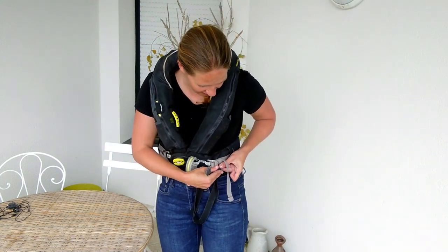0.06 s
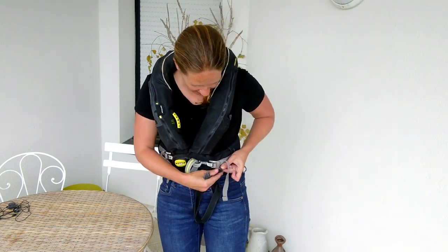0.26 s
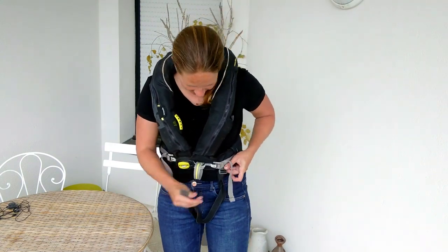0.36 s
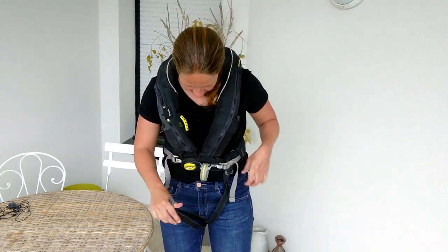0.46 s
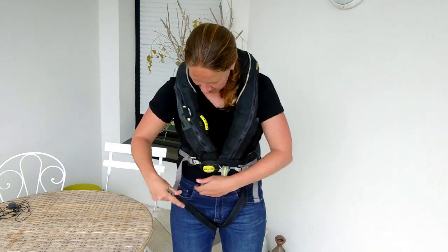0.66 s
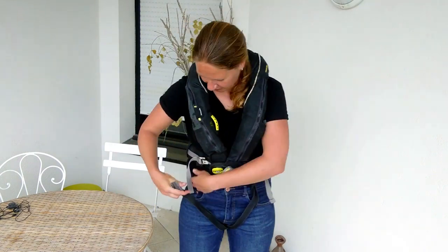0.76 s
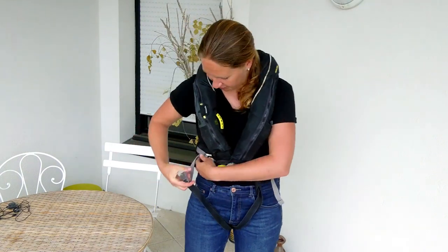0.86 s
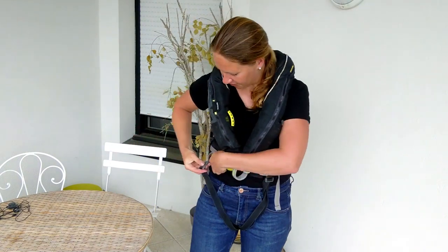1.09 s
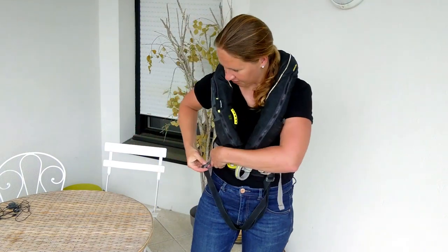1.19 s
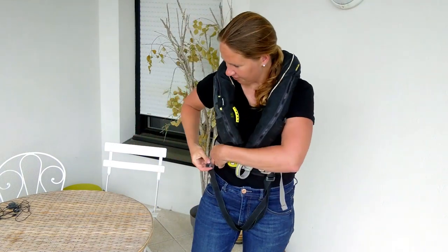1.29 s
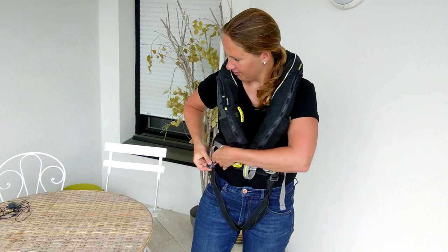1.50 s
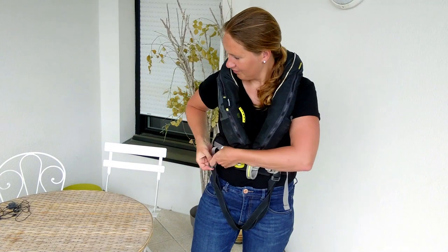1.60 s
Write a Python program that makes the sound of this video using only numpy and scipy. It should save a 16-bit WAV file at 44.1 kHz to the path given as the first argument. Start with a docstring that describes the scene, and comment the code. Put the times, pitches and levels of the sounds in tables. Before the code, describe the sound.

One sharp plastic buckle click, followed by faint strap handling over a low room hum.

```python
"""A low hum fills a bare, hard-walled room. After a faint rustle and a small knock, the plastic buckle
of a life jacket snaps shut: its latch cracks, the plastic rings and the walls echo.
Hands then work the webbing strap, which rustles as it rubs and ticks against the fittings.
The microphone hears little above 5 kHz."""
import sys
import numpy as np
from scipy import signal
from scipy.fft import rfft, irfft
from scipy.io import wavfile

SR = 44100
rng = np.random.default_rng(int(sys.argv[2]) if len(sys.argv) > 2 else 0)


def wav_out(sig):
    """Save sig, one row per channel (or a flat mono array), as 16-bit PCM at SR to the path in sys.argv[1]."""
    wavfile.write(sys.argv[1], SR, np.round(np.clip(np.atleast_2d(sig).T, -1, 1) * 32767).astype(np.int16))


N = 72765


def amp(db):
    """Turn decibels into a factor to multiply by."""
    return 10 ** (np.asarray(db) / 20)


def rms_one(x):
    """Scale a sound to an average (rms) strength of 1."""
    return x / np.sqrt(np.mean(x ** 2) + 1e-20)


def at_hz(table, hz, column=1):
    """Read between the rows of a table, on a log-frequency scale."""
    rows = np.array(table)
    return np.interp(np.log(hz), np.log(rows[:, 0]), rows[:, column])


def pair(mid, side, alike):
    """Mix two noises into left and right: likeness 0 or less is unrelated, 1 is the same."""
    alike = np.clip(alike, 0, 1)
    return np.sqrt(1 + alike) * mid + np.sqrt(1 - alike) * side * [[1], [-1]]


def coloured(noise, spectrum):
    """Shape two noises into a stereo sound with the given spectrum and a strength of 1."""
    # how alike the two ears' noise is: f/Hz, likeness
    likeness = [(60, 0.81), (180, 1), (550, 0.42), (1650, 0.062), (4970, -0.38), (15000, -1.16)]
    hz = np.maximum(np.fft.rfftfreq(N, 1 / SR), 1)
    mid, side = rfft(noise) * amp(at_hz(spectrum, hz))
    return rms_one(irfft(pair(mid, side, at_hz(likeness, hz)), N))


def band(x, low_hz, high_hz):
    """Gently turn down everything outside a range of frequencies."""
    edges = [low_hz, min(high_hz, .45 * SR)]
    return signal.sosfilt(signal.butter(2, edges, "band", fs=SR, output="sos"), x)


def room_hum(level_db=-47):
    """The room hums: steady noise, strongest in the bass."""
    # colour of the hum: f/Hz, relative level/dB
    spectrum = [(12, -12.5), (20, -7), (113, -1.5), (136, -5.5), (188, 1), (221, -6), (343, -5),
                (367, -12.5), (422, -6), (544, -15), (583, -12.5), (1060, -20.5), (1340, -26), (1770, -25),
                (5000, -40.5), (6500, -91), (11000, -120)]
    return amp(level_db) * coloured(rng.standard_normal((2, N)), spectrum)


def strap_rustle(grains_per_s=3000, spread_db=0.5):
    """Rubbed webbing gives off tiny uneven clicks (grains), louder when the hands are busier."""
    # how busy the hands are: t/s, relative level/dB
    effort = [(0.0, -62), (0.206, -61), (0.362, -56), (0.408, -51), (0.596, -61.5), (0.854, -56.5),
              (1.102, -56.5), (1.36, -55), (1.65, -55)]
    # colour of the rubbed fabric: f/Hz, relative level/dB
    cloth = [(300, -21), (700, 10), (1500, 4), (2500, 0.5), (4500, -2.5), (7000, -6), (9000, -43.5),
             (15000, -5.5)]
    grains = amp(spread_db * np.minimum(rng.exponential(1, (2, N)), 5))
    grains *= rng.choice([-1, 1], (2, N))
    grains *= rng.random((2, N)) < grains_per_s / SR  # keep only a random few
    times, db = np.transpose(effort)
    loudness = amp(np.interp(np.arange(N) / SR, times, db) + 0.5)
    return loudness * coloured(grains, cloth)


def strap_ticks(gain_db=-4, rise_share=.025):
    """Strap and fittings knock and scuff: each touch is a burst of noise that dies fast."""
    # touches: t/s, relative level/dB, centre f/Hz, width/octaves, time to fade by 60 dB/s
    touches = [(.144, -39.5, 880, 1.4, 0.036), (0.412, -49, 2550, 2.2, 0.062),
               (0.496, -49.5, 4180, 1.16, 0.27), (0.521, -45.5, 1870, 0.4, 0.097),
               (.535, -37.5, 1680, 0.67, 0.056), (.538, -50, 3370, 0.44, 0.12),
               (0.549, -38, 1100, 1.5, 0.062), (.653, -47.5, 1690, 0.61, 0.038),
               (0.754, -55, 6900, .2, 0.057), (.807, -54, 3000, 1.3, 0.075), (.89, -48, 3880, 1.24, 0.077),
               (.893, -55.5, 6800, 0.11, 0.23), (0.911, -48, 2480, 1, 0.18), (.914, -44, 700, 0.68, 0.16),
               (0.949, -48, 3200, 1.3, 0.15), (.955, -51, 6500, .2, 0.098), (0.99, -40, 1760, 1.97, 0.047),
               (1.025, -42, 1800, 1.8, 0.044), (1.034, -53, 6750, 0.11, 0.066),
               (1.052, -41, 920, 0.6, 0.047), (1.102, -56, 6850, 0.14, 0.073),
               (1.155, -58, 3940, 0.2, 0.13), (1.183, -38, 1110, 1.43, 0.1),
               (1.184, -49.5, 4200, .4, 0.058), (1.195, -47.5, 1620, 0.7, 0.18),
               (1.28, -37, 1110, 1.15, .06), (1.3, -39.5, 940, 0.8, 0.047),
               (1.427, -51.5, 2740, 0.52, 0.023), (1.463, -43, 1700, 1.26, .05),
               (1.483, -44, 1800, 1.2, 0.083), (1.553, -42.5, 2600, 0.57, 0.039),
               (1.56, -38, 706, 0.42, 0.064), (1.63, -48, 2260, 0.84, 0.061)]
    out, t = np.zeros(N + SR), np.arange(SR // 4) / SR
    for start, db, hz, octaves, fade_s in touches:
        edge_ratio = 2 ** (np.clip(octaves, .1, 4) / 2)
        noise = rms_one(band(rng.standard_normal(len(t)), hz / edge_ratio, hz * edge_ratio))
        rise = 1 - np.exp(-t / (rise_share * fade_s))
        fade = amp(db + gain_db - 60 * t / fade_s)
        out[int(start * SR):][:len(t)] += noise * rise * fade
    return out[:N]


def buckle_snap(crack_db=-22, ring_db=-5, bass_cut_hz=432):
    """The latch cracks and the plastic rings; quick echoes repeat both in a slightly changed colour."""
    # the latch's first touch and snap, then its first quick echoes from nearby surfaces:
    # t/s, relative level/dB, brightness/(dB per octave)
    clicks = [(.2060, -28, 0), (.2068, -12, 3), (.2074, -10, -3), (.2096, -17, 1), (.2110, -16, 0),
              (.2139, -20, 1), (.2174, -23, 0)]
    # the buckle's own tones: f/Hz, relative level/dB, time to fade by 60 dB/s
    tones = [(287, -8.5, 0.011), (581, -27, 0.16), (667, -7.5, 0.043), (980, 1.5, 0.0059),
             (1207, -12.5, 0.036), (1526, -26.5, 0.17), (1592, -18.5, 0.12), (2054, -14, 0.051),
             (2150, -4, 0.01), (2620, -1, 0.01), (3390, -3, 0.0075), (4020, 1.5, 0.012),
             (4670, 2.5, 0.0036), (6100, -31, 0.0028), (14900, -23, .001)]
    times, click_db, tilt_db = np.transpose(clicks)
    at, out = (times * SR).astype(int), np.zeros(N)
    out[at] = amp(click_db + tilt_db + crack_db)  # each crack is one sample long
    for hz, tone_db, fade_s in tones:
        pulse_db = click_db + tone_db + ring_db + tilt_db * np.log2(hz / 2000)
        pulses = np.full(N, 1e-18)
        pulses[at] = amp(pulse_db + rng.normal(0, 1.5, len(at)))
        # this filter turns each pulse into a fading sine wave
        decay, angle = amp(-60 / (fade_s * SR)), 2 * np.pi * hz / SR
        out += signal.lfilter([0, np.sin(angle)], [1, -2 * decay * np.cos(angle), decay ** 2], pulses)
    return signal.sosfilt(signal.butter(3, bass_cut_hz, "high", fs=SR, output="sos"), out)


def room_echo(x, gain_db=-28, build_s=.008):
    """Reflections from the hard walls build up quickly, then each frequency band fades at its own pace."""
    # the walls' echo: f/Hz, time to fade by 60 dB/s, relative level/dB, left-right likeness
    walls = [(255, 0.89, -9.5, 0.34), (420, .3, -11.5, 0.83), (570, 0.31, -3, 0.79), (860, 0.32, -3, 0.71),
             (1210, 0.25, -2.5, 0.15), (1930, 0.4, 5, 0.13), (2430, .33, -7, 0.072), (3500, 0.3, -5, 0.089),
             (4750, 0.29, -12, 0.1), (6830, 0.41, -2, .1), (10250, 0.45, -8.5, 0.047),
             (13900, 0.18, 20.5, .1)]
    t, echo = np.arange(SR) / SR, np.zeros((2, SR))
    edges_hz = 120 * 2 ** np.arange(0, 7.6, .5)  # half an octave apart
    noise = rng.standard_normal((2, 2, SR))
    for k, (low, high) in enumerate(zip(edges_hz, edges_hz[1:])):
        fade_s, db, alike = (at_hz(walls, np.sqrt(low * high), column) for column in (1, 2, 3))
        mid, side = band(noise[k % 2], low, high)
        echo += pair(mid, side, alike) * amp(db - 60 * t / fade_s)
    echo *= amp(gain_db) * (1 - np.exp(-(t / build_s) ** 2))
    return signal.fftconvolve(echo, x[None], axes=1)[:, :N]


def scene(tick_echo_db=-7, left_louder_db=3):
    """The hum, the jacket's sounds and their echo, all a little to the left."""
    hum, rustle, ticks, snap = room_hum(), strap_rustle(), strap_ticks(), buckle_snap()
    echo = room_echo(snap + amp(tick_echo_db) * ticks)
    balance = amp([[left_louder_db / 2], [-left_louder_db / 2]])
    return (hum + rustle + ticks + snap + echo) * balance


def record(dry, edge_hz=5913, treble_db=-14.5, cutoff_hz=15750):
    """The microphone turns the treble down, adds faint hiss and cuts off the very top."""
    # colour of the microphone's hiss: f/Hz, relative level/dB
    spectrum = [(3290, -33), (5600, -42), (6100, 2.5), (7770, -20.5), (10300, 2.5), (12200, -6), (15500, 2)]
    hiss = amp(-76.5) * coloured(rng.standard_normal((2, N)), spectrum)
    low = signal.sosfilt(signal.cheby2(8, 45, edge_hz, fs=SR, output="sos"), dry)
    high_pass = signal.butter(7, edge_hz + 200, "high", fs=SR, output="sos")
    treble = signal.sosfilt(high_pass, amp(treble_db) * dry + hiss)
    return signal.sosfilt(signal.ellip(12, .5, 70, cutoff_hz, fs=SR, output="sos"), low + treble)


dry = scene()
out = record(dry)
wav_out(out)
```